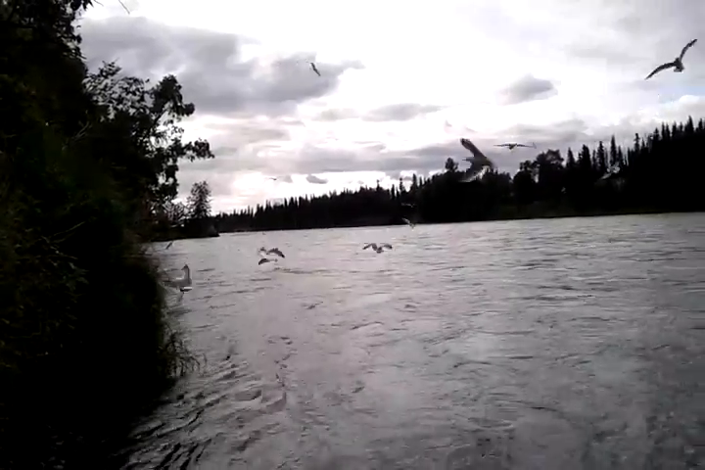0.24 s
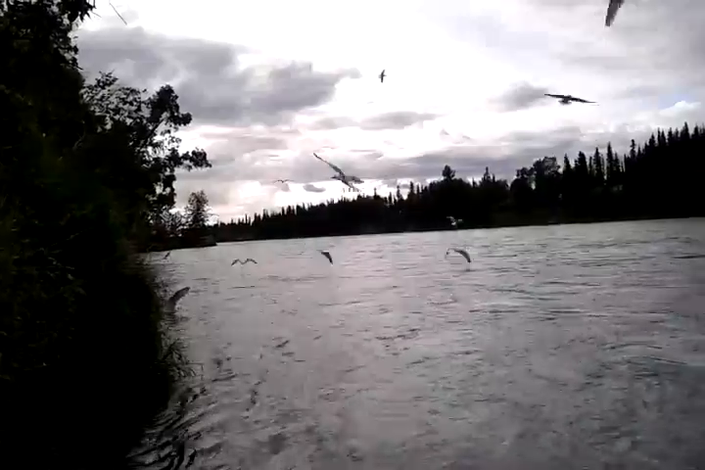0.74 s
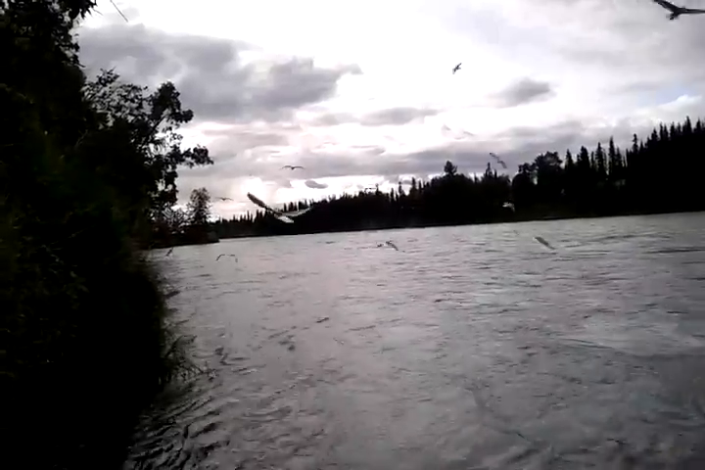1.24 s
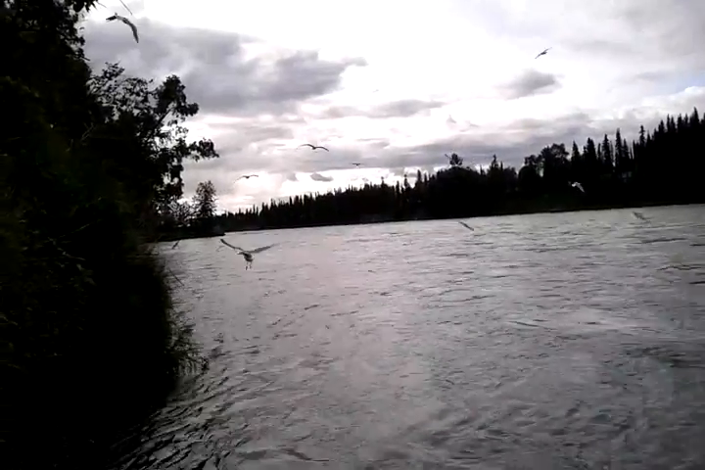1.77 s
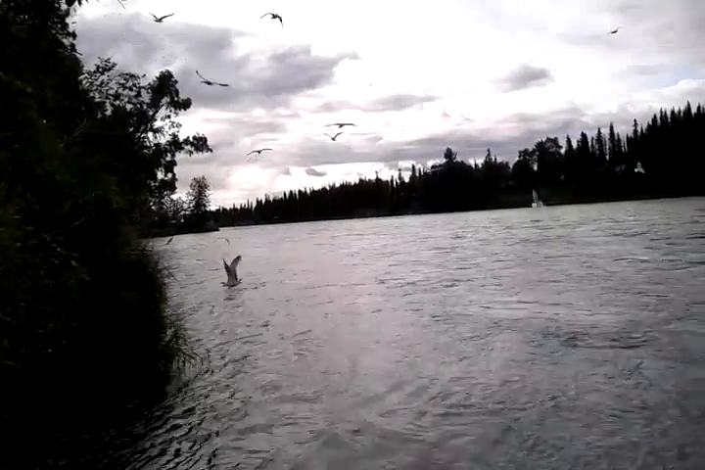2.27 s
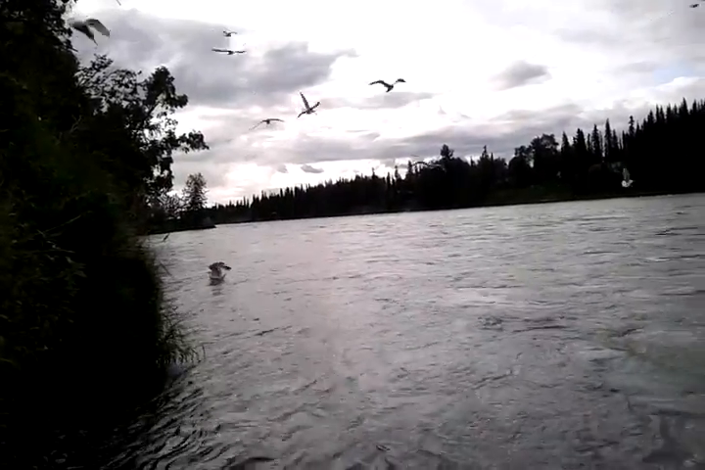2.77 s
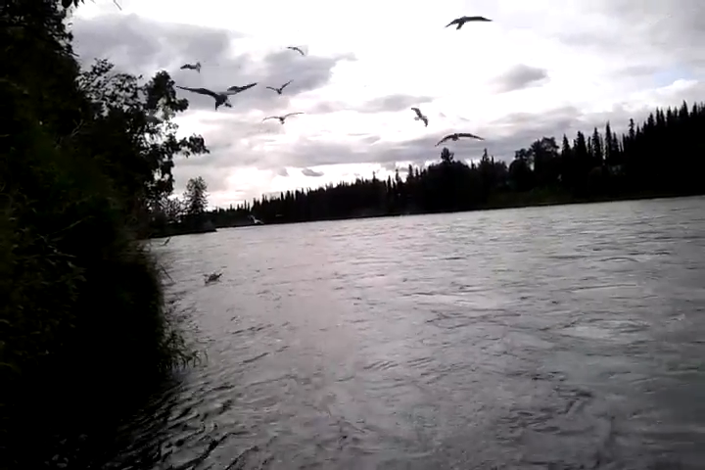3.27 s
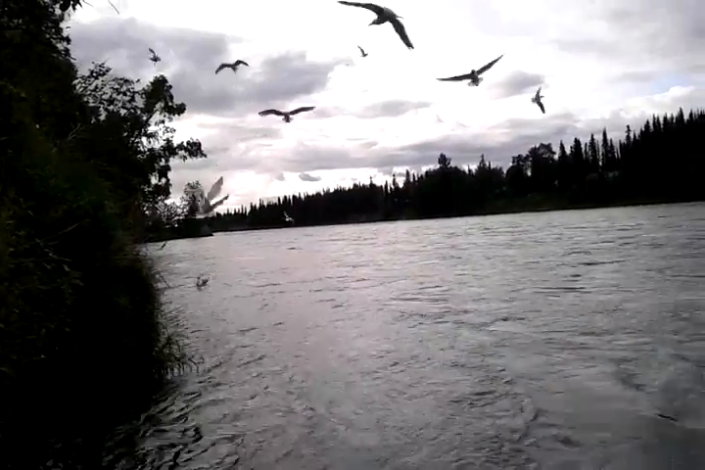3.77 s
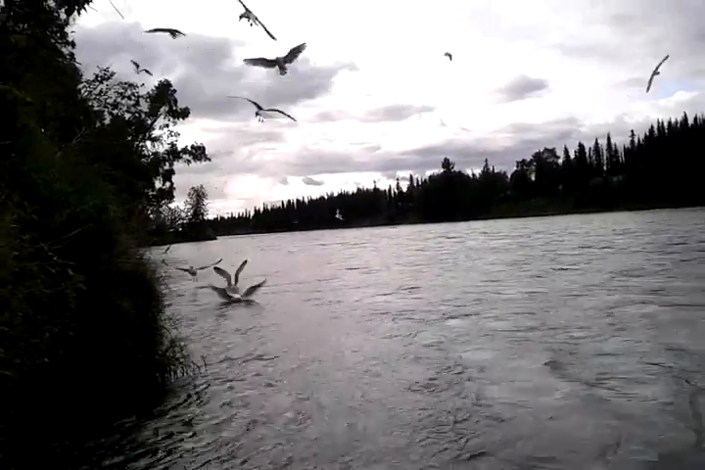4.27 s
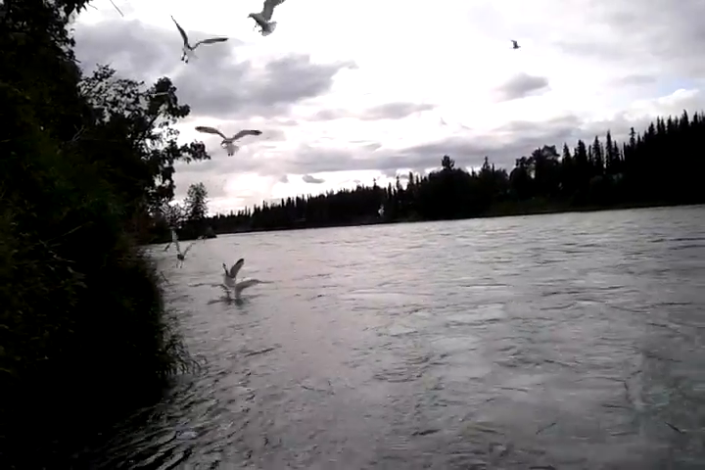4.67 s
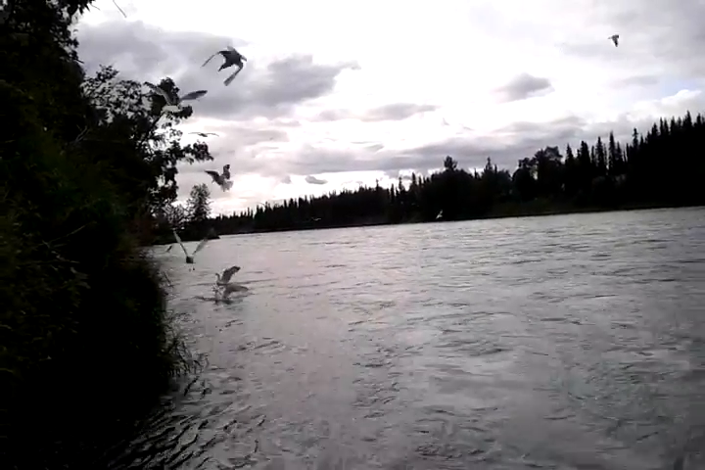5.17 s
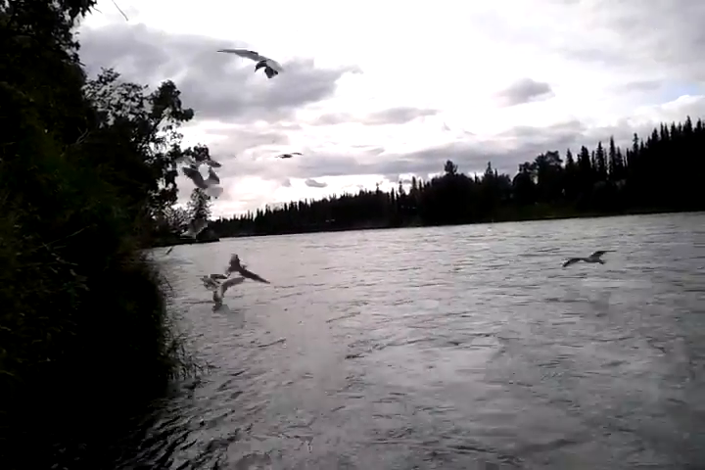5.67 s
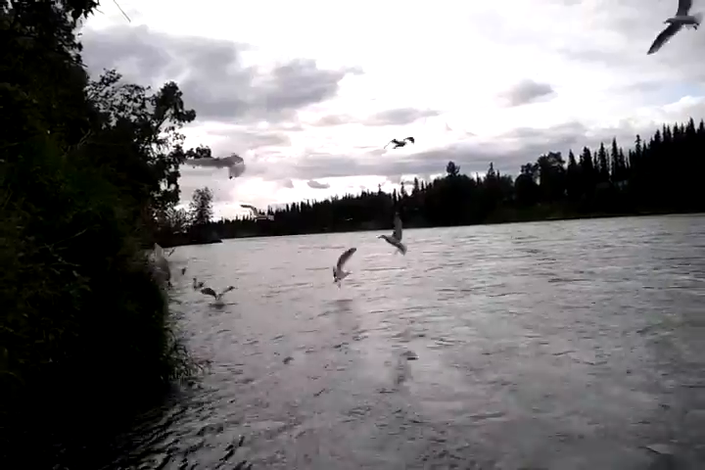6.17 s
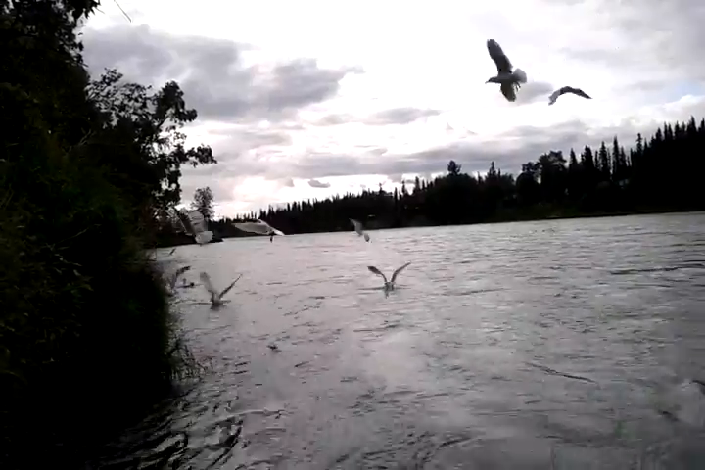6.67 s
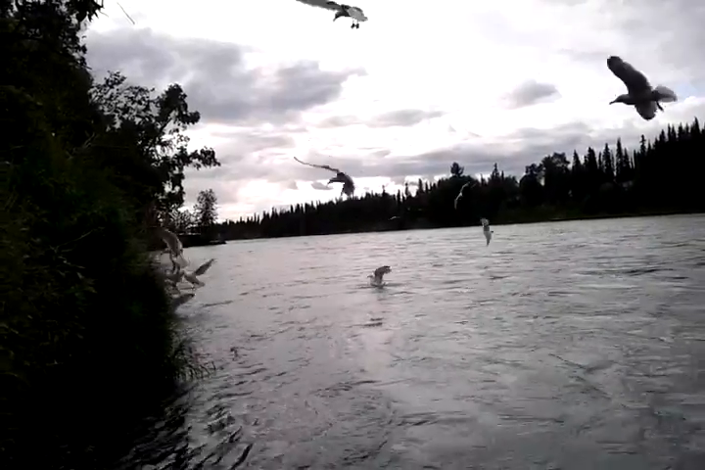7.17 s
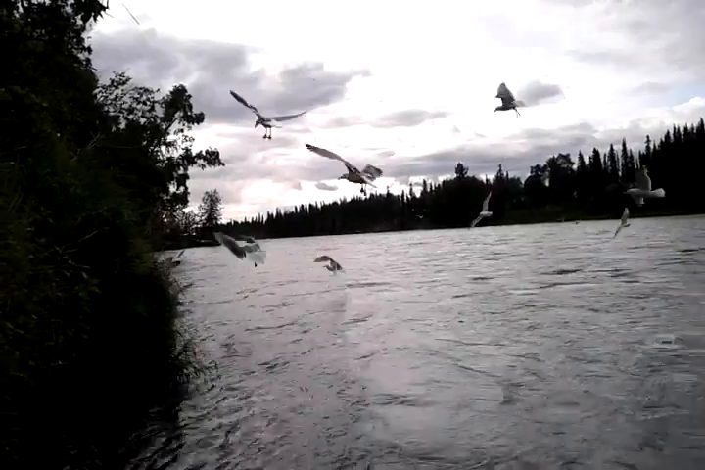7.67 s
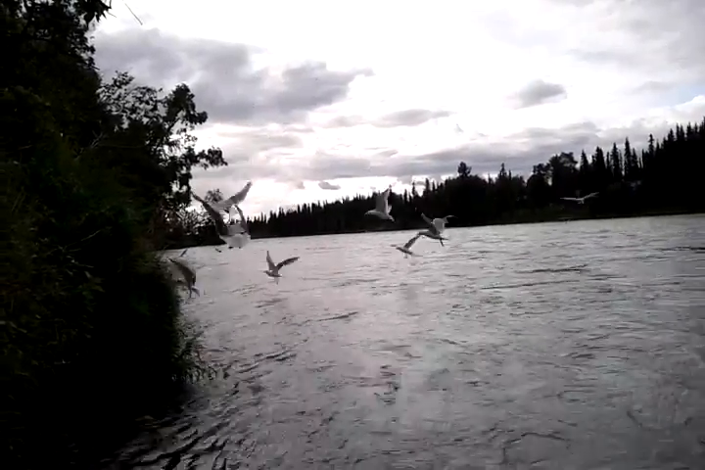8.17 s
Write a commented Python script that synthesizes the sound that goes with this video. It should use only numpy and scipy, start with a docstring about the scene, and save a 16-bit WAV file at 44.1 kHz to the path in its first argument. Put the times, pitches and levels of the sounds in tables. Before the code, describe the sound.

A steady, grainy river rush with hollow low-mid gurgling continues throughout, over a barely audible low hum that fades after 5.5 seconds. Water leads at first, with a faint slap at 0.6. Short gull cries arrive around 1.4-1.7, a croak at 2.1, then small splashes and clipped cries from 2.6, including a clearer, higher one near 3.0. More arched cries and rasping croaks follow until 3.7. Water drops slap between 3.9 and 4.8 while the birds pause. At 5.0 a cry opens the squabble: a harsh quavering growl at 5.2-5.4 overlaps a thin wavering wail, continuing past 6 with a rising cry. A strong splash lands at 6.55. Loud wails, cries and catching croaks crowd together around 7.0-7.6, then thin out slightly. Another big splash comes near 8.05, with piercing wails and final cries to 8.4. Faint woodland echo; small, bass-light microphone with dulled extreme highs.

```python
"""A river rushes over a faint hum, from grains of noise and sines; spray swells and drops slap the water.
Single short gull cries, arches of swept harmonics, then break in, with rattling croaks between.
They give way to a squabble over fish: a quavering growl and thin wails with undertones overlap the cries.
Later splashes are bigger, as birds land on the water; the wooded bank returns a faint echo throughout."""
import sys
import numpy as np
from scipy import signal
from scipy.fft import rfft, irfft
from scipy.io import wavfile

SR = 44100
rng = np.random.default_rng(int(sys.argv[2]) if len(sys.argv) > 2 else 0)


def master(y):
    """Save y as 16-bit WAV."""
    cut = np.clip(np.atleast_2d(y).T, -1, 1)
    pcm = np.round(cut * 32767)  # scale
    wavfile.write(sys.argv[1], SR, pcm.astype(np.int16))


N = 372204
TIME = np.arange(N) / SR

# Breakpoints of the quavering growl; undertones are set ahead of their pulsing
# columns: t/s, f/Hz, level/dB, quaver depth/octaves, undertones/dB
GROWL_COURSE = [(5.165, 954, -43, 0.013, -40), (5.185, 1077, -27, 0.041, -36),
                (5.21, 1111, -24.5, 0.1, -32.5), (5.33, 1105, -29.5, 0.023, -34.5),
                (5.34, 997, -28, 0, -33), (5.4, 992, -30, 0.0087, -38), (5.43, 887, -36, 0.0062, -32)]


def from_db(db):
    """Decibels to gain."""
    return 10 ** (np.asarray(db) / 20)


def rms_one(x):
    """Scale to rms 1."""
    return x / np.sqrt(np.mean(x ** 2) + 1e-20)


def drift(rate, size):
    """Random wander with a spread of about 1: straight lines between `rate` random points a second."""
    steps = np.arange(size) * rate / SR
    points = rng.standard_normal(int(steps[-1]) + 2)
    return 1.2 * np.interp(steps, np.arange(len(points)), points)


def coloured(x, spectrum):
    """Filter a signal by a curve of (f/Hz, level/dB), then scale it to rms 1."""
    hz, db = np.transpose(spectrum)
    grid = np.maximum(np.fft.rfftfreq(N, 1 / SR), 1)
    gain = from_db(np.interp(np.log(grid), np.log(hz), db))
    return rms_one(irfft(rfft(x) * gain, N))


def resonate(x, hz, width_hz):
    """Two-pole resonance with gain 1 on top."""
    r = np.exp(-np.pi * width_hz / SR)
    zeros = np.array([1, 0, -1]) * (1 - r * r) / 2
    poles = [1, -2 * r * np.cos(2 * np.pi * hz / SR), r * r]
    return signal.lfilter(zeros, poles, x + 1e-18)


def grains(per_s, spread_db):
    """Clicks at random moments, a few much larger than the rest."""
    sizes = from_db(spread_db * np.minimum(rng.exponential(1, N), 4)) * rng.choice([-1, 1], N)
    return sizes * (rng.random(N) < per_s / SR)


def add(out, start_s, sound):
    """Mix a sound in at a time."""
    at = int(start_s * SR)
    out[at:at + len(sound)] += sound[:max(N - at, 0)]


def fades(t, attack_s, release_s):
    """Attack, hold and release over the times t."""
    return np.clip((t - t[0]) / attack_s, 0, 1) * np.clip((t[-1] - t) / release_s, 0, 1)


def syrinx_phase(pitch, jitter, jitter_rate):
    """Phase of a membrane whose pitch trembles by the share jitter."""
    return 2 * np.pi * np.cumsum(pitch * (1 + jitter * drift(jitter_rate, len(pitch)))) / SR


def hum():
    """A faint low hum of slightly trembling pitch, its level set by a curve."""
    # columns: t/s, level/dB
    hum_levels = [(0, -65), (.7, -71), (1.2, -67), (2.7, -80), (3.1, -61), (5.2, -64.5), (5.5, -88),
                  (8.44, -86.5)]
    level = from_db(np.interp(TIME, *np.transpose(hum_levels)))
    return level * np.sin(syrinx_phase(np.full(N, 85), jitter=.01, jitter_rate=5.9))


def river():
    """Countless small bubbles merge into a rush, with a hollow gurgle in the low middle."""
    # Relative spectrum of the rush; columns: f/Hz, level per Hz/dB
    rush_colour = [(40, -47.5), (75, -29.5), (110, -20.5), (160, -8.5), (220, -5), (320, -3), (365, -7),
                   (420, -3.5), (620, 0.5), (760, -6.5), (1010, -5.5), (1250, -10), (2500, -14),
                   (3600, -18.5), (5000, -17.5), (7200, -29)]
    # Hollow resonances of the current; columns: f/Hz, width/Hz, middle level/dB
    hollows = [(514, 89, -46.5), (606, 110, -56.5)]
    rush = coloured(grains(per_s=14000, spread_db=3), rush_colour) * from_db(-36.5 + 0.87 * drift(9, N))
    gurgle = 0
    for hz, width_hz, db in hollows:
        hollow = rms_one(resonate(rng.standard_normal(N), hz, width_hz))
        gurgle = gurgle + from_db(db + 1.7 * drift(14, N)) * hollow
    return rush + gurgle


def sprays(droplets):
    """Wings and feet throw up spray that swells and dies away; finer spray has less low sound."""
    # Gain applied to the droplets, with rise and fall each spanning range_db
    # columns: t of peak/s, peak gain/dB, rise/s, fall/s, lowest f/Hz
    spray_swells = [(.59, -48, 1, 0.16, 800), (1.42, -39.5, 0.17, 0.18, 4540),
                    (1.82, -47.5, 0.16, 0.39, 1500), (2.37, -47.5, 0.35, .2, 800),
                    (2.635, -37, .06, 0.047, 3500), (2.81, -41, 0.053, .05, 2000),
                    (3.35, -47, 0.066, .15, 3500), (4.4, -44, 0.44, 0.48, 900),
                    (4.78, -40, 0.49, 0.61, 897), (6.56, -35.5, 0.18, 0.43, 700), (6.9, -41, 0.26, 1, 700),
                    (8.04, -30.5, 0.26, 0.26, 498), (8.3, -50.5, 0.26, 1, 700)]
    range_db = 20
    out = np.zeros(N)
    for s, db, rise_s, fall_s, lowest_hz in spray_swells:
        away = np.maximum((s - TIME) / rise_s, (TIME - s) / fall_s)
        highpass = signal.butter(2, lowest_hz, "high", fs=SR, output="sos")
        out += from_db(db - range_db * away) * signal.sosfilt(highpass, droplets)
    return out


def slap(db, hz):
    """A sharp burst of water rings a pocket of air."""
    t = TIME[:SR // 10]
    decay_s, onset_s = 0.034, 0.00067  # time to fall by 60 dB; time constant of the rise
    burst = rng.standard_normal(len(t)) * from_db(-60 * t / decay_s) * (1 - np.exp(-t / onset_s))
    ring = resonate(burst, hz, 350) + 0.081 * resonate(burst, 4500, 5000)
    return from_db(db) * ring / np.abs(ring).max()


def splashes():
    """A fine mist of spray, larger drops that each ring a tiny bubble, and single slaps."""
    # Relative spectrum of the mist; columns: f/Hz, level per Hz/dB
    mist_colour = [(300, -18), (800, -1), (1600, 10), (3000, 7), (5000, 7), (6500, 9), (7300, -30.5)]
    # Single slaps on the water; columns: t/s, peak level/dB, ring f/Hz
    slap_hits = [(0.5994, -42, 2940), (1.842, -29, 6620), (2.62, -33, 2910), (2.6837, -33, 6000),
                 (3.8567, -25.5, 4960), (4.4223, -27.5, 3450), (4.6528, -30, 4940), (4.6736, -32, 5600),
                 (4.7825, -23.5, 4750), (6.534, -34, 2660), (6.566, -13, 2830), (8.0543, -19.5, 3120),
                 (8.1125, -23, 3040), (8.1344, -28, 3980)]
    mist = coloured(grains(per_s=6600, spread_db=3.0), mist_colour) * from_db(3.05 * drift(60, N))
    bubble_pitches = np.geomspace(1400, 6200, 16)  # Hz
    drops = sum(resonate(grains(per_s=24, spread_db=5.0), hz, hz / 22) for hz in bubble_pitches)
    out = sprays(from_db(1) * mist + from_db(-6.5) * rms_one(drops))
    for s, db, hz in slap_hits:
        add(out, s, slap(db, hz))
    return out


def bank(x, scatter_db, t60):
    """A few distinct echoes, and dull scatter from the trees that falls by 60 dB in t60 seconds."""
    # Distinct echoes off the bank; columns: delay/s, level/dB
    echo_taps = [(.0043, -35), (0.017, -41), (0.048, -49)]
    t = TIME[:SR // 2]
    scatter = resonate(rng.standard_normal(len(t)), 1500, 2700) * from_db(-60 * t / t60)
    response = from_db(scatter_db) * scatter / np.sqrt(np.sum(scatter ** 2))
    for delay, db in echo_taps:
        response[int(delay * SR)] += from_db(db)
    return signal.fftconvolve(x, response)[:N]


def bill_db(hz):
    """Boost of a harmonic as it glides through a resonance of the windpipe and open bill."""
    # columns: f/Hz, width/Hz, boost/dB
    bill_peaks = [(1185, 110, 5.5), (2645, 450, 4.5), (3777, 316, 11.5), (4590, 130, 16), (5480, 300, 5.5),
                  (6780, 170, 6.5)]
    return sum(db / (1 + (2 * (hz - centre) / width) ** 2) for centre, width, db in bill_peaks)


def harmonics(phase, levels_db, shimmer):
    """A stack of harmonics, each flickering a little in strength."""
    out = 0
    for k, db in enumerate(levels_db, 1):
        flicker = 1 + shimmer * drift(90, len(phase))
        out = out + from_db(db) * flicker * np.sin(k * phase)
    return out


def undertones(phase, pitch, rough, count):
    """Cycles that repeat in groups of count put lines between the harmonics; the throat shapes them."""
    # Throat resonances that colour the rasp; columns: f/Hz, width/Hz, relative level/dB
    throat_peaks = [(1050, 760, 0.5), (1900, 250, -5), (2330, 520, -1.5), (3255, 1000, -4)]
    out = 0
    for k in range(1, 5 * count):
        if k % count == 0:
            continue  # a harmonic of the call itself
        line_hz = pitch * k / count
        gain = sum(from_db(db) / (1 + (2 * (line_hz - hz) / width) ** 2) for hz, width, db in throat_peaks)
        # so small a bird radiates next to nothing below about 800 Hz
        gain = gain / (1 + (800 / line_hz) ** 8)
        flutter = 1 + rough * drift(250, len(phase))
        # the lines start nearly in step, so each group of cycles is a distinct pulse
        out = out + gain * flutter * np.sin(phase * k / count + rng.normal(0, 0.9))
    return rms_one(out) / np.sqrt(2)  # as strong as a sine of amplitude 1


def croak(length, hz, glide, tone_db, rasp_db, reach_hz):
    """A brief swell in which the membrane rattles in groups of three cycles."""
    along = np.linspace(0, 1, int(length * SR))
    pitch = hz * 2 ** (glide * (along - .5))
    # the longer a croak lasts, the more chaotic its vibration
    phase = syrinx_phase(pitch, jitter=.65 * length, jitter_rate=700)
    # the wider the bill opens, the higher the rasp reaches
    lowpass = signal.butter(6, reach_hz, fs=SR, output="sos")
    rasp = signal.sosfilt(lowpass, undertones(phase, pitch, rough=0.74, count=3))
    return np.sin(np.pi * along) * (from_db(tone_db) * np.sin(phase) + from_db(rasp_db) * rasp)


def course(rows):
    """Sample times of a call, and each of its controls at those times."""
    s, *columns = np.transpose(rows)
    t = np.arange(s[0], s[-1], 1 / SR)
    return [t] + [np.interp(t, s, column) for column in columns]


def growl(second_db, third_db):
    """A harsh call that quavers and then settles lower, its cycles grouped in threes."""
    quaver_hz, crest_s = 21.3, 5.213
    open_hz, dull_db_per_hz = 997, 0.6  # the overtones are full at this pitch and fade away from it
    rasp_pulse_db = 4  # the rasp flares in each trough of the quaver
    t, centre, level_db, depth, under_db = course(GROWL_COURSE)
    quaver = depth * np.cos(2 * np.pi * quaver_hz * (t - crest_s))
    pitch = centre * 2 ** quaver
    phase = syrinx_phase(pitch, jitter=0.0055, jitter_rate=580)
    overtone_db = level_db - dull_db_per_hz * np.abs(pitch - open_hz)
    tone = harmonics(phase, [level_db, overtone_db + second_db, overtone_db + third_db], shimmer=0.11)
    rasp_gain = from_db(under_db - rasp_pulse_db * quaver / depth.max())
    rasp = rasp_gain * undertones(phase, pitch, rough=.28, count=3)
    return (tone + rasp) * fades(t, 0.0043, .006)


def wail(under_db, third_db, rows, rolloff_db):
    """A long wavering call; under strain its cycles pair up and undertones appear."""
    # the higher a wail is pushed, the more every second cycle weakens, raising the undertones
    strain_db_per_hz = 0.1005
    t, pitch, level_db, second_db = course(rows)
    phase = syrinx_phase(pitch, jitter=0.0045, jitter_rate=450)
    base_db = (level_db + second_db) / 2 + third_db
    upper_db = [base_db + rolloff_db * (k - 3) + bill_db(k * pitch) for k in range(3, 6)]
    under_gain = from_db(under_db + strain_db_per_hz * (pitch - pitch.mean()))
    under = under_gain * undertones(phase, pitch, rough=.33, count=2)
    tone = harmonics(phase, [level_db, second_db] + upper_db, shimmer=0.16)
    return np.sqrt(2) * (tone + under) * fades(t, .006, .006)  # root 2 makes the levels rms


def cry(length, hz, glide, arch, drop, level_db, swell_db, second_db, third_db, fourth_db, brighten_db):
    """One clear cry: an arch of pitch that carries its harmonics through the bill's resonances."""
    attack_s, release_s, drop_s = 0.0047, 0.011, .014
    rolloff_db = -2  # per harmonic above the 4th
    t = np.arange(int(length * SR)) / SR
    along = t / length - .5
    # the ends sag by the arch, and the last moment drops away
    bend = glide * along - arch * (2 * along) ** 2 - drop * np.exp((t - length) / drop_s)
    pitch = hz * 2 ** bend
    overtones_db = [second_db, third_db] + [fourth_db + rolloff_db * k for k in range(3)]
    source_db = [0] + [db + brighten_db * along for db in overtones_db]
    swelling_db = level_db + swell_db * along
    levels_db = [swelling_db + db + bill_db(k * pitch) for k, db in enumerate(source_db, 1)]
    phase = syrinx_phase(pitch, jitter=0.005, jitter_rate=360)
    return harmonics(phase, levels_db, shimmer=.17) * fades(t, attack_s, release_s)


def gulls():
    """All the birds' voices."""
    # Arched cries, levels ahead of the bill's boost; a negative arch or drop bends the pitch up
    # columns: start t/s, end t/s, f/Hz, glide/octaves, arch/octaves, drop/octaves, middle level/dB,
    # swell/dB, 2nd, 3rd and 4th harmonic re 1st/dB, brightening of the overtones/dB
    arched_cries = [(1.401, 1.481, 1185, -.08, 0.0075, 0.016, -38, 3, 2.5, -16, -28, -8),
                    (1.47, 1.505, 1131, 0.05, -0.028, 0, -30.5, -3, -22, -16, -16.5, 2),
                    (1.662, 1.69, 1090, -0.23, -0.012, 0.02, -33.5, 3, -15, -28, -36, 0),
                    (2.592, 2.637, 1453, -0.047, 0.0021, -0.01, -41.5, -7, 4, -10, -15, 2),
                    (2.853, 2.885, 1333, -0.088, 0, 0.0099, -33, 1, -8.5, -25, -37, -0.5),
                    (2.941, 3.114, 1673, -0.042, 0.0021, 0, -24.5, -3, -14, -22, -23, -4),
                    (3.115, 3.153, 1079, -0.17, 0.016, 0.038, -30, -13, 0.5, -19, -23, -4),
                    (3.363, 3.441, 1215, -0.19, -.01, 0.016, -30.5, -4.5, -6.5, -17.5, -20, -10.5),
                    (3.437, 3.477, 1165, 0.15, -0.029, -0.016, -33.5, 2, -7, -13, -13.5, -3),
                    (3.603, 3.715, 1060, -0.24, 0.013, 0.038, -39.5, 2, -5, -11, -16, -3),
                    (5.039, 5.102, 1277, -.02, 0.089, 0, -28.5, 0, -6, -25, -20, -11),
                    (5.8, 6.033, 1199, -0.01, -0.035, -.15, -21.5, 6.5, -5, -27.5, -34.5, -13.5),
                    (6.537, 6.641, 1307, -0.038, -0.016, 0.028, -32, -0.5, -4, -28.5, -29.5, -3),
                    (6.697, 6.717, 1163, -.18, -0.029, 0.026, -24.5, 4, -2.5, -21.5, -27, 2),
                    (6.743, 6.793, 1586, -.02, 0.0087, -0.048, -49, -5, 18.5, -12.5, -20, -0.5),
                    (6.89, 6.986, 1475, -.1, 0.0089, 0.043, -27.5, -14, -14, -26, -34.5, 1.5),
                    (7.271, 7.3, 1249, 0.071, 0.023, 0, -23.5, -5, 1, -15, -38, -4.5),
                    (7.292, 7.55, 1321, 0.02, 0.049, 0.2, -20, 5, -1.5, -24, -31.5, 5.5),
                    (7.8, 7.955, 1327, -0.14, 0.13, 0.14, -27, -10, -7, -10.5, -30.5, -3),
                    (8.218, 8.303, 1485, -0.045, 0.027, -0.032, -27.5, 0, -8.5, -19, -31, 16),
                    (8.302, 8.442, 1410, -.08, -0.0255, -.1, -32, 0, -5, -5.5, -29, -6)]
    # Wavering wails, each: undertones at mean pitch/dB, 3rd harmonic re mean of first two ahead of bill/dB,
    # and a course with columns: t/s, f/Hz, rms level/dB, 2nd harmonic rms level/dB
    wail_courses = [(-46, -20, [(5.15, 1790, -36, -62), (5.178, 1840, -26, -60), (5.22, 1715, -30.5, -66),
                    (5.36, 1605, -38.5, -69), (5.52, 1700, -34, -62.5), (5.68, 1745, -34, -58),
                    (5.77, 1800, -22.5, -54.5), (5.9, 1770, -28.5, -55.5), (5.98, 1805, -28.5, -63),
                    (6.04, 1680, -25, -58.5)]), (-66.5, -16.5, [(6.035, 1657, -27, -50),
                    (6.085, 1660, -21.5, -42.5), (6.15, 1632, -22.5, -47.5), (6.21, 1698, -22.5, -40),
                    (6.265, 1732, -24, -34), (6.292, 1840, -25.5, -18.5), (6.325, 1828, -26.5, -16.5),
                    (6.378, 1762, -28, -33.5), (6.405, 1780, -26, -25), (6.445, 1640, -33, -32)]),
                    (-70, -19.5, [(6.74, 1325, -36, -39), (6.76, 1306, -30, -28),
                    (6.82, 1322, -31.5, -19.5), (6.86, 1311, -25, -22), (6.9, 1272, -22, -36),
                    (6.96, 1246, -18, -25), (6.977, 1284, -21.5, -28.5), (6.99, 1285, -17, -22),
                    (7.02, 1304, -19, -20), (7.041, 1226, -13, -14.5), (7.058, 1020, -24, -45.5)]),
                    (-39, -26.5, [(6.98, 1929, -23.5, -46), (7.008, 1937, -21, -41),
                    (7.066, 1979, -20, -50.5), (7.124, 1906, -16.5, -45.5), (7.178, 1824, -19.5, -63),
                    (7.204, 1944, -18, -55), (7.294, 2068, -26, -53), (7.322, 1931, -20, -44),
                    (7.422, 1834, -20, -61.5), (7.454, 2026, -24.5, -52), (7.462, 2081, -41.5, -80),
                    (7.488, 1992, -24, -48.5), (7.526, 2074, -33.5, -62.5), (7.556, 1936, -21, -27.5),
                    (7.592, 1857, -20, -64), (7.603, 1824, -35, -70)]),
                    (-38.5, -22, [(7.95, 2180, -41, -57), (7.962, 2077, -28, -41),
                    (7.982, 2129, -33.5, -49), (8.17, 1937, -21, -44), (8.182, 2014, -24.5, -58),
                    (8.202, 2092, -29.5, -45), (8.218, 1946, -15, -39), (8.242, 2008, -38.5, -50),
                    (8.28, 1800, -32, -64)])]
    # Croaks, alone or where a call catches and breaks off, levels at the peak of the swell
    # columns: middle t/s, length/s, f/Hz, glide/octaves, tone/dB, rasp ahead of its filter/dB, rasp reach f/Hz
    croak_calls = [(2.088, 0.082, 1257, -0.019, -31.5, -33.5, 2300),
                   (2.812, 0.039, 1278, 0.34, -30, -26.5, 3400),
                   (3.278, .075, 1208, -0.0079, -44, -30, 2860),
                   (3.43, 0.062, 1203, -0.037, -41, -28.5, 2600),
                   (5.77, 0.024, 1106, 0.2, -27.5, -27.5, 3100),
                   (6.448, 0.021, 1234, -0.3, -50, -25.5, 4640),
                   (6.664, 0.022, 1055, 0.003, -23, -16.5, 4500),
                   (6.881, 0.012, 1350, -0.0088, -44, -23, 2380),
                   (7.053, .02, 1005, -0.24, -27.5, -24.5, 4170),
                   (7.246, 0.025, 1140, 0.24, -19.5, -26, 3570), (7.55, 0.02, 1020, -0.29, -26, -20, 4380),
                   (7.774, 0.038, 1136, 0.14, -19.5, -26.5, 3896),
                   (7.925, 0.044, 1210, -0.23, -45, -26, 3020)]
    out = np.zeros(N)
    for start, end, *shape in arched_cries:
        add(out, start, cry(end - start, *shape))
    for under_db, third_db, rows in wail_courses:
        add(out, rows[0][0], wail(under_db, third_db, rows, rolloff_db=-6))
    add(out, GROWL_COURSE[0][0], growl(second_db=-3.5, third_db=2.5))
    for s, length, *voice in croak_calls:
        add(out, s - length / 2, croak(length, *voice))
    return out


def scene():
    """Birds and their echo over the water and the hum."""
    voices = gulls()
    echo = bank(voices, scatter_db=-28.0, t60=0.48)
    return (voices + echo + river() + splashes() + hum())[None]


def record(dry):
    """A small microphone: no deep bass, and a steep top edge."""
    bass_hz, top_hz = 62, 7250
    thin = signal.sosfilt(signal.butter(4, bass_hz, "high", fs=SR, output="sos"), dry)
    return signal.sosfilt(signal.ellip(10, .2, 80, top_hz, fs=SR, output="sos"), thin)


dry = scene()
out = record(dry)
master(out)
```